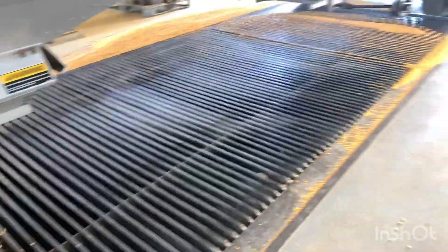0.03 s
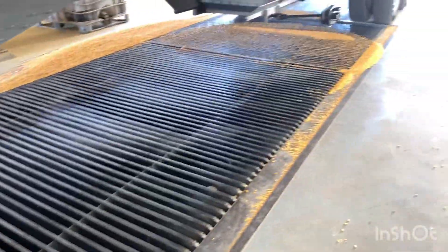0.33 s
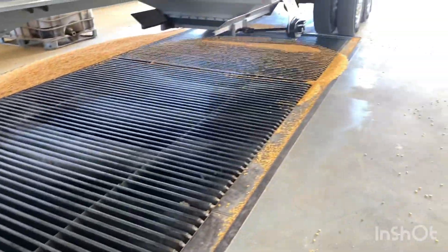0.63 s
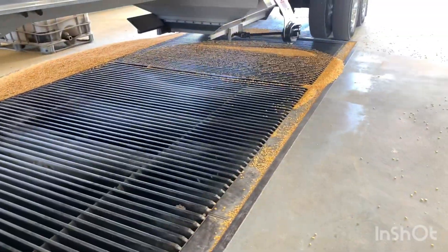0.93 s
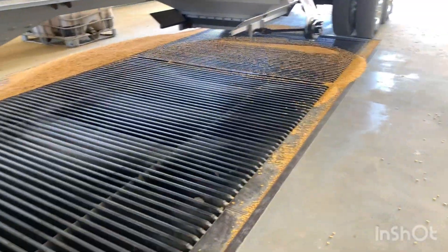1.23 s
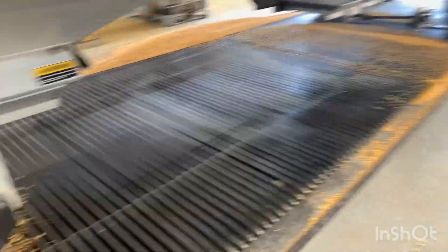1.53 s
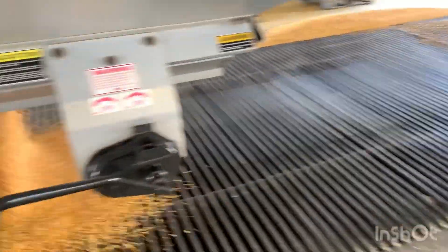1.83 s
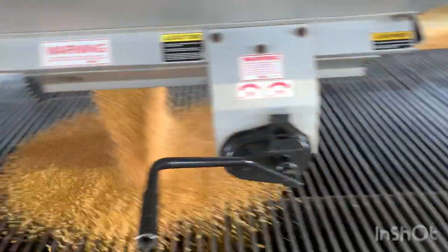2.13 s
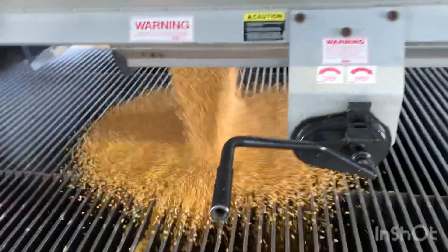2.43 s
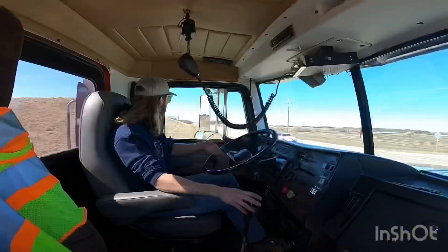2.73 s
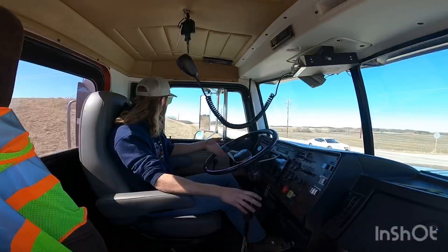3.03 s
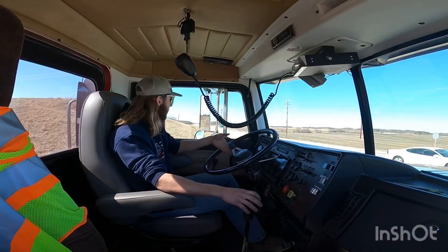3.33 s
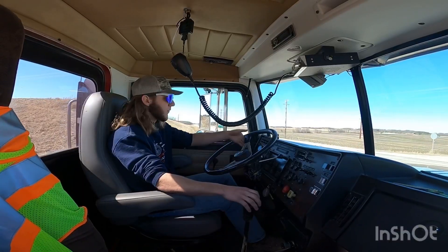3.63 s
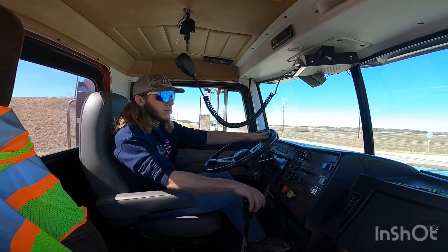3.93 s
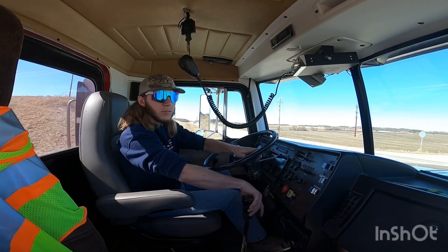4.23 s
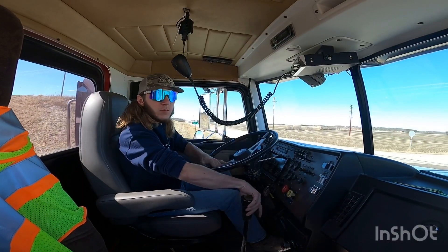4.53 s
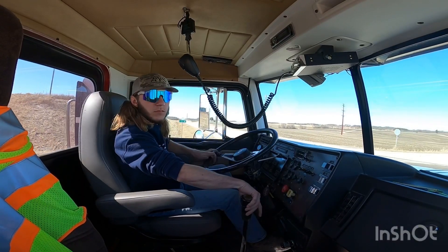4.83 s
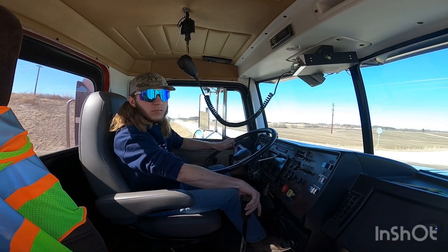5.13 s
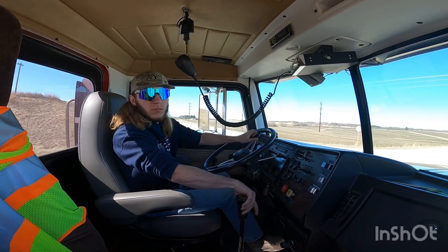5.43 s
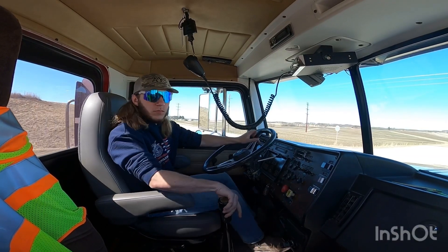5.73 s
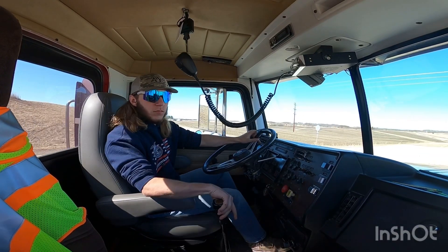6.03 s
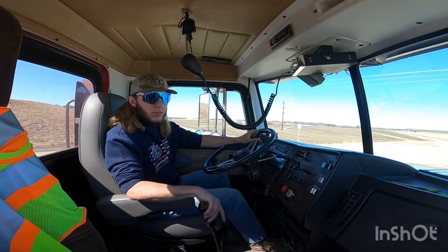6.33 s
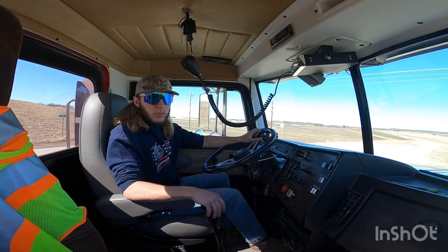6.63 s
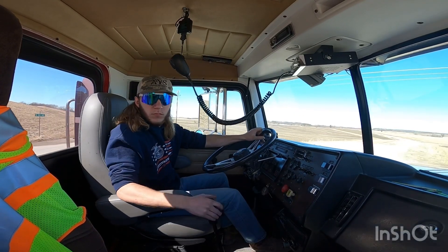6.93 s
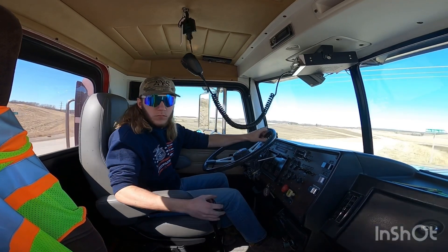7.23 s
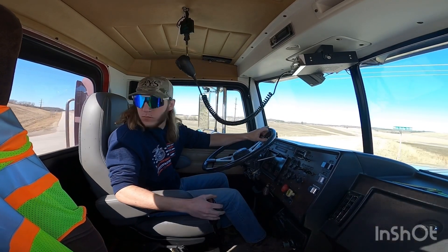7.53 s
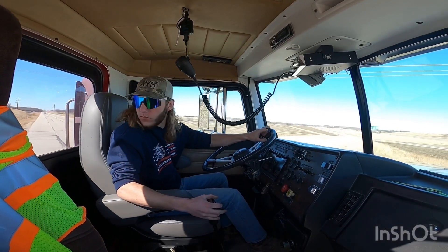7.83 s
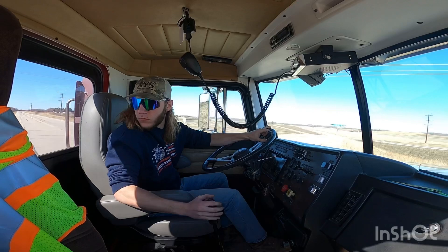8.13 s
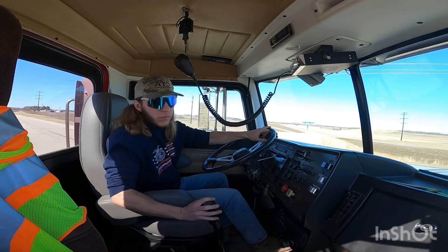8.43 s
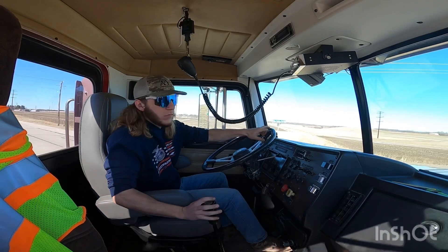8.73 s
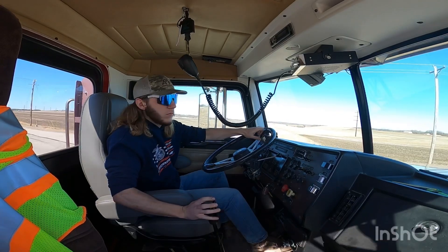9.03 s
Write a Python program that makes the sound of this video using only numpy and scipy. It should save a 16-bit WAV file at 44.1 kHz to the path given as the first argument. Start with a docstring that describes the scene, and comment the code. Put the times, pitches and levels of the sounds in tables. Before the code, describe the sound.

Grain hisses onto metal bars over a machine drone, before a sudden cut to a rumbling truck cab with the diesel revving through a shift.

```python
"""A six-cylinder diesel truck, heard from the cab, lugs, pulls up, drops for a gear change and pulls again.
Exhaust pulses boom, combustion knocks ring the panels and valves clatter, over road rumble, a whine,
thin air whistles and small rattles. Before it comes a short opening scene: corn pours from a hopper
trailer through a steel grate in an unloading hall, over a machine drone. Then a hard cut to the cab."""
import sys
import numpy as np
from scipy import signal
from scipy.fft import rfft, irfft
from scipy.io import wavfile

SR = 44100
rng = np.random.default_rng(int(sys.argv[2]) if len(sys.argv) > 2 else 0)


def waveform_to_disk(signal):
    """Save audio, clipped to [-1, 1], as 16-bit WAV at the path in sys.argv[1]."""
    frames = np.transpose(np.atleast_2d(signal))
    scaled = np.clip(frames, -1, 1) * 32767
    samples = np.round(scaled).astype(np.int16)
    wavfile.write(sys.argv[1], SR, samples)


N = 410130
T = np.arange(N) / SR
HZ = np.maximum(np.arange(N // 2 + 1) * SR / N, 1)
CUT_S = 2.718  # from the hall to the cab
LIFT_S, RESUME_S = 5.43, 6.46  # the throttle closes for the gear change and opens again

# Tone colours of the opening scene. Each row: frequency in Hz, level in dB.
DRONE_EQ = [(20, -32.5), (42, -13.5), (70, 2), (115, -7.5), (170, -7.5), (275, -12), (330, -17.5),
            (600, -26), (1500, -39.5)]  # machinery
HISS_EQ = [(3500, -26), (6000, -14), (7500, -4), (9000, -7), (10000, -0.5), (10600, -6.5), (11900, 0),
           (12700, -12.5), (15300, -5), (16000, -12)]  # bright sizzle of pouring corn, with fixed treble notches that are not its own
PATTER_EQ = [(200, -3.5), (400, -1.5), (560, -5.5), (800, -1), (3100, 0), (4000, 3.5), (5200, -5.5),
             (6500, -10), (10000, -39)]  # kernels on the grate
# Ringing steel. Each row: pitch in Hz, width in Hz, level in dB.
BAR_MODES = [(992, 46, 2), (1098, 80, 5), (1280, 52, -1), (2080, 220, -7.5)]  # the grate bars
PING_MODES = [(3880, 390, -5), (4370, 260, -1.5)]  # kernels bouncing off
# Nearness to the corn. Each row: time in seconds, nearness from 0 (across the grate) to 1 (beside it).
NEARNESS = [(0, 0.34), (.4, .02), (1.15, 0.076), (1.85, 0.77), (2.7, 0.9)]

# Tone colours of the cab. Each row: frequency in Hz, level in dB.
AIR_EQ = [(2000, -9), (5000, 8.5), (6100, 0.5), (7500, -0.5), (9500, -15), (13000, -25.5)]  # rushing air
TRIM_EQ = [(1500, -15), (4000, 21.5), (7500, 14), (9000, 4.5), (11200, -5.5), (13000, -21.5)]  # ticking, fizzing trim
RUMBLE_EQ = [(12, -21), (23, 3), (45, -2), (65, -8.5), (90, 3), (118, -3.5), (140, 1.5), (175, -12),
             (225, -8), (280, -18), (500, -22.5), (1200, -94)]  # the floor
CLATTER_EQ = [(400, -12.5), (900, -1), (1220, 3), (1600, 1.5), (1930, -0.5), (2300, -5.5), (3100, -7.5),
              (3700, -9.5), (4600, -18.5), (6500, -28.5), (12000, -58.5)]  # injectors and valves
KNOCK_EQ = [(100, -25), (220, -2.5), (310, -2.5), (450, -5), (600, -5.5), (800, -8), (1200, -11),
            (1700, -30.5), (4000, -75.5)]  # combustion
# Resonances in the cab. Each row: pitch in Hz, width in Hz, level in dB.
WHINE_MODES = [(914.5, 28, 0), (933, 36, -7)]  # a narrow whine
SLACK_MODES = [(100, 20, -1.5), (137, 28, -3.5), (207.6, 13, -6)]  # the slack drive train shaking the floor
PANEL_MODES = [(231, 16, 0.5), (328, 26, 3.5), (394.4, 10, 3.5), (457, 14, -1), (721, 31, -9.5),
               (945, 74, -10.5), (1202, 24, -6), (1885, 59, -17.5)]  # panels and air space
# Loose fittings knocking. Each row: start in seconds, level in dB, pitch in Hz.
FITTING_KNOCKS = [(2.834, -16, 507), (2.998, -22, 466), (3.416, -13.5, 392), (3.46, -14.5, 578),
                  (3.565, -11, 379), (3.708, -13, 427), (3.886, -16, 597), (4.276, -18, 450),
                  (4.333, -9, 340)]
# Gear lever and trim ticking. Each row: start in seconds, level in dB, decay in seconds.
TRIM_TICKS = [(2.807, -58.5, 0.23), (3.344, -52, 0.017), (3.845, -50, 0.049), (5.203, -52, 0.027),
              (5.443, -47, 0.014), (5.768, -56, .015), (6.166, -52, 0.011), (7.03, -54.5, 0.069),
              (8.28, -55.5, .02), (8.9, -55, 0.088), (9.243, -49, 0.043)]
# Fader rides for the whine and the intake whistle. Each row: time in seconds, level in dB.
WHINE_LEVEL = [(2.72, -42), (3.18, -41), (3.55, -35.5), (3.92, -39), (4.8, -38.5), (5.47, -42.5),
               (6.4, -44.5), (6.48, -36), (7.05, -35.5), (7.2, -39), (8.3, -38.5), (9.3, -42)]
INTAKE_LEVEL = [(2.72, -54), (3.05, -49.5), (3.22, -63), (3.33, -46.5), (3.48, -50.5), (3.68, -41.5),
                (3.85, -55), (4.05, -47), (5.5, -64), (6.42, -63), (6.52, -52), (6.8, -64), (7.03, -46.5),
                (7.55, -59.5), (8.2, -56.5), (8.95, -47.5), (9.3, -47)]
# Engine speed. Each row: time in seconds, firing rate in Hz.
FIRING_RATE = [(2.72, 35), (3.05, 37.95), (3.45, 39.57), (3.84, 44.18), (4.24, 61.2), (4.6, 67.2),
               (5.0, 76.05), (5.35, 80.57), (5.6, 73.8), (6.4, 57.08), (6.68, 64.22), (6.95, 62),
               (7.4, 67.1), (8.7, 78.32), (9.0, 82.54), (9.3, 85.63)]
# How hard the engine works. Each row: time in seconds, effort in dB over a steady pull.
EFFORT = [(2.72, -6), (3.05, -4), (3.2, -7), (3.6, 0.5), (4.08, 5.5), (4.5, -0.5), (5.22, -0.5), (5.55, -4),
          (6.38, -6), (6.55, 1), (6.8, -2.5), (7.08, 1.5), (7.5, -2), (8.92, 1.5), (9.3, 1)]
# How the cab booms with the exhaust. Each row: frequency in Hz, gain in dB.
CAB_BOOM = [(35, -28.5), (41, -30.5), (46, -34), (50, -20), (64, -21.5), (72, -19.5), (87, -15), (94, -15),
            (102, -19), (114, -23), (128, -17), (145, -15.5), (165, -22), (190, -28), (212, -26.5),
            (234, -17), (258, -26)]
# The first three exhaust harmonics. Each entry: level in dB before the cab shapes it.
HARMONICS_DB = [2, -1.5, -2.5]
# Weak extra engine tones: some between the firing harmonics, plus the fourth to sixth harmonics.
# Each pair: multiple of the six-firing cycle, level in dB.
EXTRA_ORDERS = [3, 8, 11, 14, 15, 24, 30, 36]
EXTRA_DB = [-39.5, -34, -36, -42, -36.5, -39, -42, -43.5]


def undb(db):
    """Decibels to gain."""
    return 10 ** (np.asarray(db) / 20)


def curves(table):
    """The columns of a table, joined by straight lines in time."""
    s, *columns = np.transpose(table)
    return [np.interp(T, s, c) for c in columns]


def swell(peak_s, width_s):
    """A bell-shaped rise to 1 and back."""
    return np.exp(-((T - peak_s) / width_s) ** 2)


def unit(x):
    """Scale to rms 1."""
    return x / np.sqrt(np.mean(x ** 2))


def noise():
    """White noise."""
    return rng.standard_normal(N)


def hail(per_s, spread_db):
    """A dense hail of tiny impacts of uneven strength."""
    return (rng.random(N) < per_s / SR) * noise() * undb(spread_db * noise())


def walk(rate):
    """Smooth random wandering with spread 1, up to about rate times a second."""
    return unit(irfft(rfft(noise()) * np.exp(-(HZ / rate) ** 2), N))


def colour(x, eq):
    """Shape x with an EQ curve that rolls off above its last point; rms 1."""
    hz, db = np.transpose(eq)
    gain = undb(np.interp(np.log(HZ), np.log(hz), db)) * np.minimum(hz[-1] / HZ, 1) ** 4
    return unit(irfft(rfft(x) * gain, N))


def ring(x, modes):
    """Excite resonances with x, rolling off from an octave above the highest; rms 1."""
    response = sum(undb(db) / (1 + 1j * (HZ ** 2 - hz ** 2) / (HZ * width)) for hz, width, db in modes)
    return unit(irfft(rfft(x) * response / (1 + (HZ / (2 * modes[-1][0])) ** 6), N))


def stereo(pair, diffuse, left_db, left_lag_ms):
    """Place two signals: the first is direct sound, the second scatters and differs between the sides."""
    share = np.clip(diffuse, 0, 1)
    direct = np.sqrt(1 - share / 2) * rfft(pair[0])
    scattered = np.sqrt(share / 2) * rfft(pair[1])
    lag = np.exp(-1j * np.pi * HZ * left_lag_ms / 1000)
    left = irfft((direct + scattered) * lag, N) * undb(left_db / 2)
    right = irfft((direct - scattered) / lag, N) * undb(-left_db / 2)
    return np.array([left, right])


def lugging(hz):
    """How much the engine labours: 1 at 40 firings a second, less as the revs climb."""
    return (40 / hz) ** 2


def coasting(lift_fade_s, resume_fade_s, overlap_s=0):
    """1 while the throttle is closed, 0 under power; overlap_s widens the gap at both ends."""
    lifted = 1 + np.tanh((T - LIFT_S + overlap_s) / lift_fade_s / 2)
    not_resumed = 1 - np.tanh((T - RESUME_S - overlap_s) / resume_fade_s / 2)
    return lifted * not_resumed / 4


def crank_locked(firings, repeat, steps_per_firing=400):
    """Impacts that recur every six firings, as no two cylinders are alike, mixed with free noise."""
    share = np.clip(repeat, 0, 1)
    cylinders = rng.standard_normal((6, steps_per_firing))
    orders = rfft((cylinders - cylinders.mean(axis=0)).ravel())
    cycle = irfft(orders / np.sqrt(np.abs(orders) + 1))  # no one order stands far out
    step = (firings * steps_per_firing).astype(int)
    pattern = cycle[step % len(cycle)] * (np.diff(step, prepend=0) > 0)
    return np.sqrt(share) * unit(pattern) + np.sqrt(1 - share) * noise()


def firing_gate(firings, depth, spread_db):
    """A gain that swells once a firing; each of the six cylinders has its own strength."""
    strength = undb(spread_db * rng.standard_normal(6))[firings.astype(int) % 6]
    return unit(1 + depth * strength * np.sin(np.pi * firings) ** 4)


def machine_drone(near):
    """Machinery fills the hall with a low bed of noise."""
    hum = [colour(noise(), DRONE_EQ) for _ in range(2)]
    return stereo(hum, diffuse=0.05, left_db=-0.5, left_lag_ms=-0.32) * undb(-39 + 3.2 * near)


def corn(near):
    """Pouring corn sizzles brightly; kernels patter and ping on the grate and ring its bars."""
    hiss = [colour(hail(per_s=24000, spread_db=1.8), HISS_EQ) for _ in range(2)]
    patter = [colour(hail(per_s=9000, spread_db=2), PATTER_EQ) for _ in range(2)]
    bars = [ring(noise(), BAR_MODES) for _ in range(2)]
    pings = [ring(hail(per_s=560, spread_db=2), PING_MODES) for _ in range(2)]
    stream = stereo(hiss, diffuse=0.025, left_db=0, left_lag_ms=0.1787) * undb(-27.5 + 4.2 * near)
    stream += stereo(patter, 0.57 + HZ / 9000, left_db=0.5, left_lag_ms=-0.457) * undb(-33.5 - 1.6 * near)
    stream += stereo(bars, diffuse=0.7, left_db=4.5, left_lag_ms=-0.22) * undb(-44 + 7 * near ** 2)
    stream += stereo(pings, diffuse=1, left_db=-2.5, left_lag_ms=0) * undb(-44)
    return stream * undb(0.51 * walk(rate=24))  # it falls in slight surges


def air_and_trim(effort_db, rise_db_per_s=0.2):
    """Air rushes around the cab and the trim fizzes; both grow as the truck gathers speed."""
    level_db = -61.5 + 0.58 * effort_db + rise_db_per_s * (T - RESUME_S)
    rush = [colour(noise(), AIR_EQ) for _ in range(2)]
    air = stereo(rush, diffuse=0.7, left_db=1.5, left_lag_ms=0.078)
    fizz = np.array([colour(hail(per_s=2500, spread_db=2), TRIM_EQ) for _ in range(2)])
    return air * undb(level_db + 8.5 + 0.9 * walk(rate=25)) + fizz * undb(level_db + 2 * walk(rate=20))


def rattles(knock_decay_s=0.0097, tick_attack_s=0.0015):
    """Loose fittings give short hollow knocks; lever and trim give dry, grainy ticks."""
    knocks, ticks = np.zeros(N), np.zeros(N)
    age = T[:SR // 4]
    for s, db, hz in FITTING_KNOCKS:
        i = int(s * SR)
        knocks[i:i + len(age)] += undb(db - 3) * np.sin(2 * np.pi * hz * age) * np.exp(-age / knock_decay_s)
    for s, db, decay_s in TRIM_TICKS:
        i = int(s * SR)
        envelope = (1 - np.exp(-age / tick_attack_s)) * np.exp(-age / decay_s)
        ticks[i:i + len(age)] += undb(db + 7) * envelope[:N - i]
    grain = np.array([colour(hail(per_s=3000, spread_db=1.5), TRIM_EQ) for _ in range(2)])
    return np.outer(undb([2, -2]), knocks) + ticks * grain


def whistle(hz, width_hz):
    """A narrow, breathy band of noise that follows a pitch."""
    angle = 2 * np.pi * np.cumsum(hz) / SR
    band = [walk(width_hz) * np.cos(angle) + walk(width_hz) * np.sin(angle) for _ in range(2)]
    return stereo(band, diffuse=0.67, left_db=5, left_lag_ms=0.048)


def overrun_whistle(start_hz=5460, sag_hz=472):
    """Off the throttle a high air whistle swells briefly, then fades as it sags."""
    progress = np.clip((T - LIFT_S) / (RESUME_S - LIFT_S), 0, 1.1)
    gate = coasting(lift_fade_s=0.08, resume_fade_s=0.07, overlap_s=0.11)
    level_db = -57 + 4 * swell(peak_s=6, width_s=0.08) - 2 * progress ** 4 + 0.6 * walk(rate=12)
    return whistle(start_hz - sag_hz * progress ** 3.6, width_hz=180) * gate * undb(level_db)


def intake_whistle(hz, effort_db, base_hz=3500):
    """Air whistles through the intake, going sharp with effort, when lugging and at top revs."""
    level_db, = curves(INTAKE_LEVEL)
    flutter_db = (0.77 + 2.6 * lugging(hz)) * walk(rate=16)  # the flow is unsteady at low revs
    top_revs = np.clip((hz - 77) / 5, 0, 1)
    pitch_hz = base_hz + 34 * effort_db + 164.4 * lugging(hz) + 108.4 * top_revs
    return whistle(pitch_hz, width_hz=160) * undb(level_db + flutter_db)


def gearbox(hz, effort_db, coast, pitch_hz=1906):
    """The gears sing while they carry load."""
    level_db = -44.5 + 0.5 * effort_db - 6 * lugging(hz)
    return whistle(np.full(N, pitch_hz), width_hz=130) * (1 - coast) * undb(level_db)


def whine():
    """A narrow, wavering whine that recedes off the throttle and returns with it."""
    level_db, = curves(WHINE_LEVEL)
    angle = 2 * np.pi * np.cumsum(WHINE_MODES[0][0] + 5 * walk(rate=15.3)) / SR
    tone = np.sqrt(2) * np.sin(angle) * undb(-2 + 1.4 * walk(rate=27))
    breath, scattered = (ring(noise(), WHINE_MODES) for _ in range(2))
    direct = tone + breath * undb(-1.5)
    return stereo([direct, scattered], diffuse=0.2, left_db=4.5, left_lag_ms=0.069) * undb(level_db)


def floor_rumble(firings, hz, coast, lurch_hz=84.9):
    """The floor rumbles; as the throttle closes the cab lurches and the slack drive train shakes."""
    shaking = crank_locked(firings, repeat=0.75 - 0.16 * lugging(hz) - 0.42 * coast)
    level_db = -27.5 + 4.5 * lugging(hz) + 1.9 * coast + 0.7 * walk(rate=2.1)
    slack = coast * ring(noise(), SLACK_MODES) * undb(-25.5)
    lurch = np.sin(2 * np.pi * lurch_hz * T) * swell(peak_s=5.45, width_s=0.095) * undb(-18.5)
    return colour(shaking, RUMBLE_EQ) * undb(level_db) + slack + lurch


def crank_throb(firings, hz, coast, start_s=4.2, rise_s=0.13):
    """Once the truck has pulled away, the crankshaft throbs once a turn, every three firings."""
    fade = np.clip((T - start_s) / rise_s, 0, 1) / (1 + (hz / 81) ** 24)  # fades at top revs
    return np.sin(2 * np.pi * firings / 3) * fade * undb(-20 + 3 * coast + 1.3 * walk(rate=6.7))


def valve_clatter(firings, hz, effort_db):
    """Injectors and valves clatter brightly, louder with effort."""
    gate = firing_gate(firings, depth=0.18 * lugging(hz), spread_db=1)
    taps = [colour(crank_locked(firings, repeat=0.087) * gate, CLATTER_EQ) for _ in range(2)]
    clatter = stereo(taps, diffuse=0.12 + HZ / 8000, left_db=7, left_lag_ms=0.044)
    return clatter * undb(-37 + 1.03 * effort_db + 0.5 * walk(rate=19))


def combustion_knock(firings, hz, effort_db, coast):
    """Combustion knocks and rings the cab panels; at low revs single firings stand apart and chug."""
    level_db = -27.5 + 0.62 * effort_db + coast - 1.8 * lugging(hz)
    gate = firing_gate(firings, depth=0.78 * lugging(hz), spread_db=3)
    blows = [colour(crank_locked(firings, repeat=0.55) * gate, KNOCK_EQ) for _ in range(2)]
    ringing = [ring(crank_locked(firings, repeat=0.4) * gate, PANEL_MODES) for _ in range(2)]
    knock = stereo(blows, diffuse=(HZ / 1500) ** 2, left_db=5, left_lag_ms=0.038)
    panels = stereo(ringing, diffuse=(HZ / 1600) ** 2, left_db=2.5, left_lag_ms=0.054)
    return knock * undb(level_db - 1) + panels * undb(level_db - 3 + 1.7 * walk(rate=8.7))


def exhaust_boom(firings, hz, effort_db, coast, coast_drop_db=9):
    """Exhaust pulses boom in the cab, sharper at high revs; weak extra engine tones fill them out."""
    angle = 2 * np.pi * firings
    shudder_db = 14 * swell(peak_s=3.11, width_s=0.26)  # the cab shudders once while the engine lugs
    rides_db = shudder_db + 0.5 * effort_db, 0, -11 * lugging(hz) - 3 * coast  # one per harmonic
    tones = np.zeros(N)
    for k, (db, ride_db) in enumerate(zip(HARMONICS_DB, rides_db), 1):
        cab_db = np.interp(k * hz, *np.transpose(CAB_BOOM))
        waver_db = (0.52 + 2.3 * coast) * walk(rate=13)
        tones -= np.cos(k * angle) * undb(db + cab_db + ride_db + waver_db)
    for order, db in zip(EXTRA_ORDERS, EXTRA_DB):
        tones += np.sin(order * angle / 6 + 2 * np.pi * rng.random()) * undb(db + walk(rate=1.9))
    return np.sqrt(2) * tones * undb(-coast_drop_db * coast)


def truck():
    """The cab mix: boom, knock and clatter ride on one crankshaft, over air, whistles and rattles."""
    hz, = curves(FIRING_RATE)
    effort_db, = curves(EFFORT)
    coast = coasting(lift_fade_s=0.062, resume_fade_s=0.02)
    firings = np.cumsum(hz * (1 + 0.003 * walk(rate=15))) / SR  # running count
    bed = air_and_trim(effort_db) + rattles()
    singing = overrun_whistle() + intake_whistle(hz, effort_db) + gearbox(hz, effort_db, coast) + whine()
    lows = floor_rumble(firings, hz, coast) + crank_throb(firings, hz, coast)
    lows += exhaust_boom(firings, hz, effort_db, coast)
    bite = valve_clatter(firings, hz, effort_db) + combustion_knock(firings, hz, effort_db, coast)
    return bed + singing + np.outer(undb([0.65, -0.65]), lows) + bite


def scene():
    """The unloading hall, then all at once the cab."""
    near, = curves(NEARNESS)
    hall = machine_drone(near) + corn(near)
    in_cab = np.clip((T - CUT_S) / 0.0055, 0, 1)
    return hall * (1 - in_cab) + truck() * in_cab


def record(dry, ceiling=0.6, top_hz=15800):
    """Soft clipping rounds the loudest peaks and a steep low-pass cuts the top."""
    rounded = dry / (1 + (dry / ceiling) ** 4) ** (1 / 4)
    return signal.sosfilt(signal.ellip(10, 0.1, 80, top_hz, fs=SR, output="sos"), rounded)


dry = scene()
out = record(dry)
waveform_to_disk(out)
```